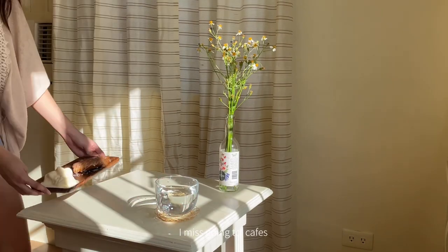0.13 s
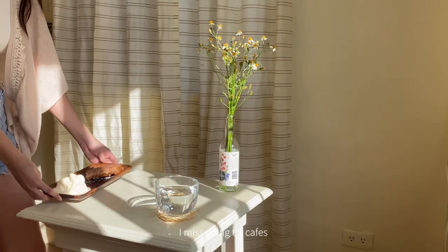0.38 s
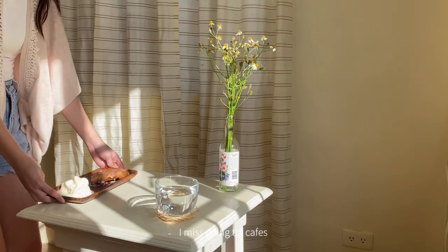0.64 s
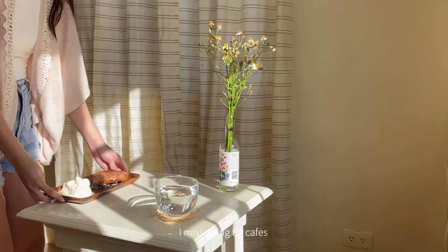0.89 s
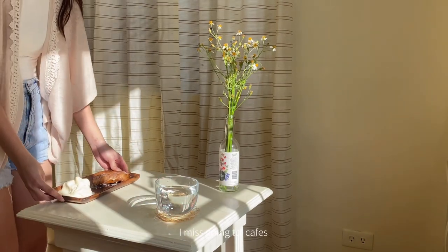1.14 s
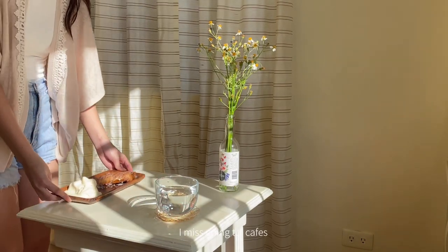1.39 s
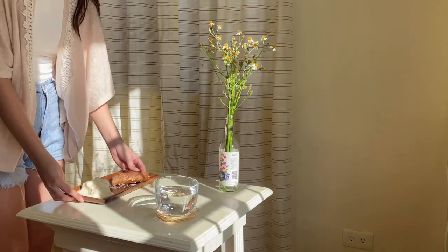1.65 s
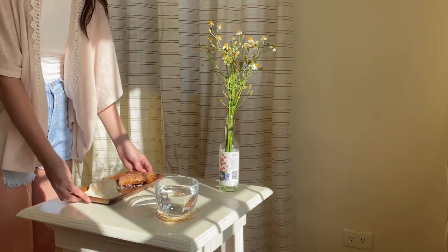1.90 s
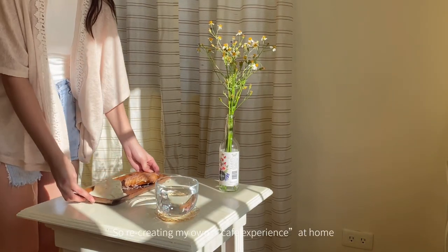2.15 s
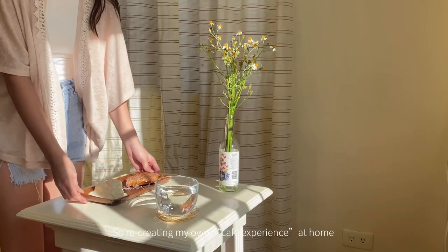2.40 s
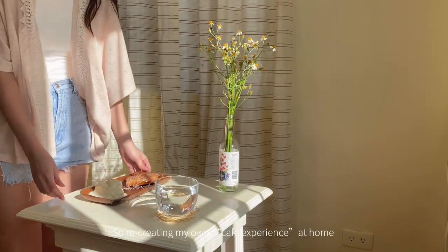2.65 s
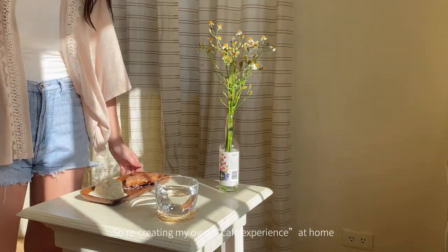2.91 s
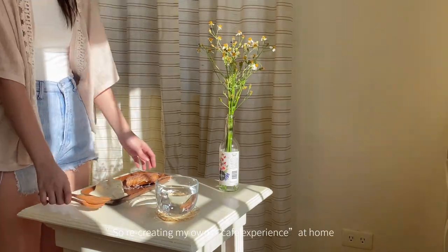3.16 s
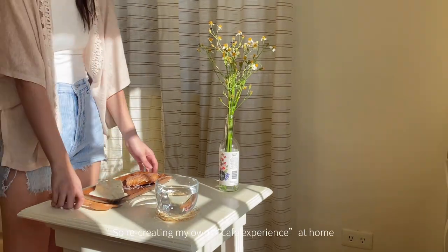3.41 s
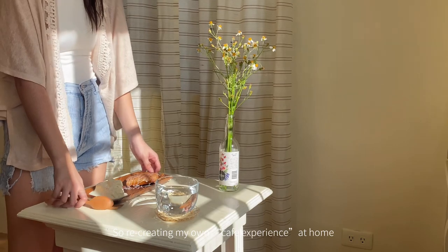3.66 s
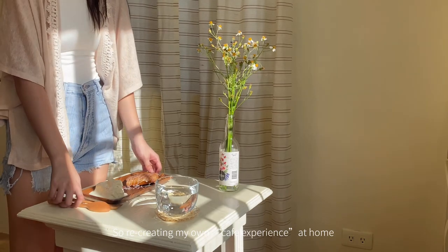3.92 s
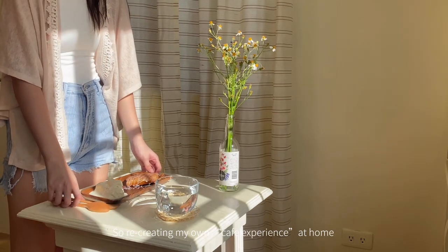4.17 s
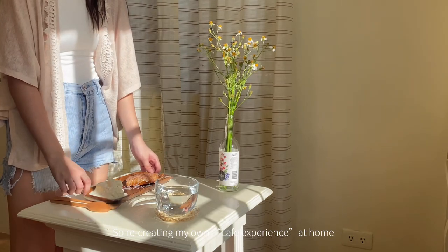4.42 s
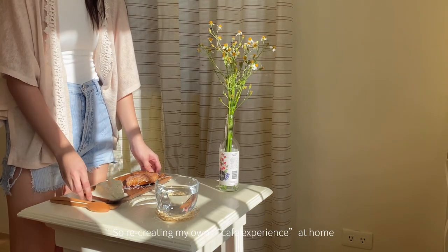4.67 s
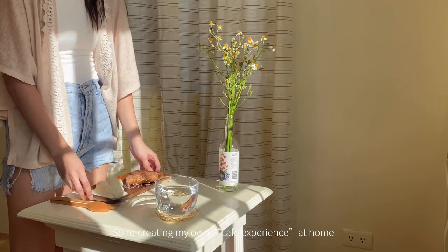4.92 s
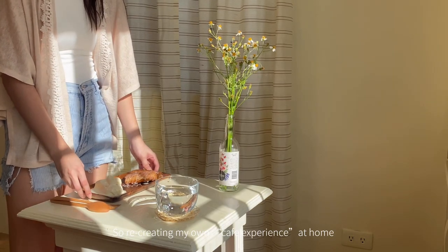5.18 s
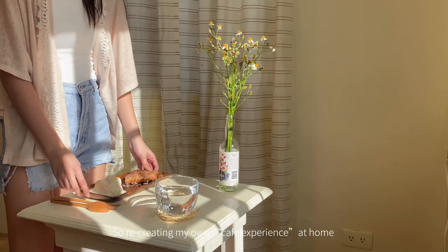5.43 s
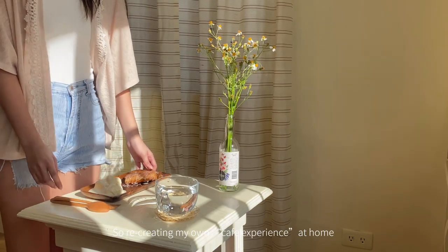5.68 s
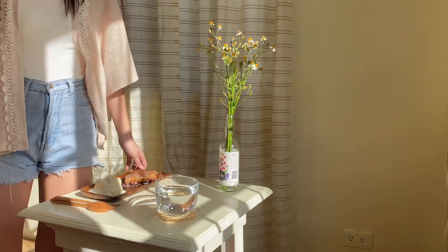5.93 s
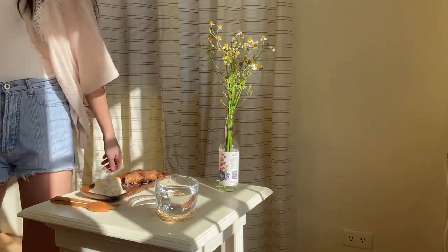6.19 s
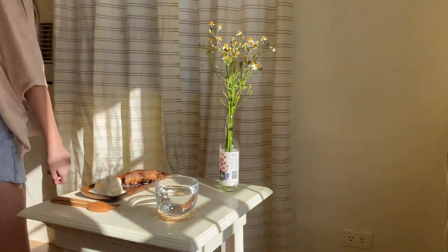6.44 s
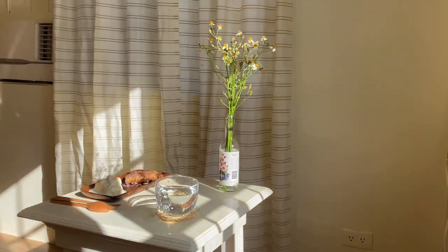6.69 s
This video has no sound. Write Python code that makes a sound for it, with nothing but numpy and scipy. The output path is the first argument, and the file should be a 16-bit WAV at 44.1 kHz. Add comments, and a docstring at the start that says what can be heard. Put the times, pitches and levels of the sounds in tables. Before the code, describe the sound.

A quiet small room with steady low murmur, wavering hum and rumble, and short soft echoes, heard closely in stereo. Faint shuffling, cloth rustle and a hoarse falling bird chirp from outdoors open it. Tiny contacts at 0.6 s lead to the loudest event at 0.8 s: a hard, hollow wooden tray knock with a bright edge and an immediate second bump. A softer bump at 1.3 s rides on a dry, grainy slide from 1.2 to 2 s, with fainter scrapes to 2.9 s, where sound drops out for an instant. From 3.2 to 4 s wooden spoons clack in irregular clusters, strongest at 3.2 and 3.7 s, with short rubs between. A sleeve brushes at 4.4 s; light taps and a scrape come around 4.6-5.2 s. Soft rustle and sliding near 5.9 s, a dry tick at 6.4 s, and sparse distant chirps until the end.

```python
"""Wooden tray and spoons on a small table

A tray is set down and slid, then spoons are laid beside it and nudged. Knocks ring decaying modes of tray,
spoons and table top and add unpitched cracks; drags are random catches that shake the same bodies.
Clothes rustle as fine shaped grain, filtered impulses give the ticks of fingers and floor and the bright edge
of the loudest tray knock, and a bird chirps hoarsely outdoors. Low hum, rumble and steady murmur lie under
a small room of noise echoes; the sound drops out once for an instant."""
import sys
import numpy as np
from scipy import signal
from scipy.fft import rfft, irfft, next_fast_len
from scipy.io import wavfile

SR = 44100
rng = np.random.default_rng(int(sys.argv[2]) if len(sys.argv) > 2 else 0)


def undo_db(level):
    """Turn decibels back into plain size, where 20 dB means ten times bigger."""
    steps = np.asarray(level, float) / 20
    return 10 ** steps


def unload_audio(sound):
    """Save the sound as a 16-bit wav file, at the path given as the first command line argument."""
    columns = np.transpose(np.atleast_2d(sound))
    # keep every value between -1 and 1, then stretch to whole-number steps
    steps = np.round(np.clip(columns, -1, 1) * 32767)
    wavfile.write(sys.argv[1], SR, steps.astype(np.int16))


N = 300573

# Modes of table top, tray and spoons. Each row: frequency in Hz, relative level in dB, T60 in seconds.
TABLE_MODES = [(88.6, -14, 0.077), (151.2, -21.5, 0.19), (246.7, -2, 0.13), (298.7, 0, 0.081),
               (329.3, -4.5, 0.11), (394.3, 3.5, 0.025)]
TRAY_MODES = [(553, -7, 0.089), (632, -2.5, 0.038), (700, -3.5, 0.025), (803, 8, 0.026), (896, -15, 0.015),
              (1037, -11, 0.026), (1100, 0, 0.023), (1310, -5, 0.01), (1590, -10, 0.032),
              (1876, -10.5, 0.011), (2270, -17, 0.019), (2560, -13, 0.0054), (3090, -23, 0.00665),
              (3553, -25, 0.018)]
SPOON_MODES = [(500, -7, 0.02), (643, -1, 0.022), (807, 6.5, 0.026), (900, -1, 0.032), (1087, 5.5, 0.021),
               (1220, 3, 0.025), (1610, 1, 0.019), (1840, -2.5, 0.013), (2215, 2.5, 0.014),
               (2625, 0.5, 0.02), (3070, -2, 0.023), (3570, -6, 0.01), (4600, -10, 0.012),
               (5320, -11, 0.0042)]
# Left-right likeness of echoes and murmur. Each row: frequency in Hz, correlation from -1 to 1.
LIKENESS = [(150, 0.84), (300, 0.4), (600, 0.5), (1200, 0.1), (6000, 0.078), (8000, 0.54), (12000, 0.53)]
BAND_EDGES_HZ = 34 * 2 ** np.arange(0, 9.1, .5)


def rms_one(x):
    """Scale to rms 1."""
    return x / np.sqrt(np.mean(x ** 2) + 1e-20)


def in_time(rows):
    """Interpolate each column over time; the first column is seconds."""
    s, *columns = np.transpose(rows)
    return [np.interp(np.arange(N) / SR, s, c) for c in columns]


def at_hz(points, hz):
    """Interpolate (Hz, value) points over log frequency."""
    point_hz, value = np.array(points).T
    return np.interp(np.log(hz), np.log(point_hz), value)


def band(x, low_hz, high_hz):
    """Band-pass filter."""
    return signal.sosfilt(signal.butter(2, [low_hz, high_hz], "band", fs=SR, output="sos"), x)


def drift(rate_hz):
    """Straight lines between normal random values, rate_hz of them per second."""
    steps = rng.standard_normal(int(N / SR * 40) + 2)
    return np.interp(np.arange(N) / SR * rate_hz, np.arange(len(steps)), steps)


def colour(x, spectrum):
    """Shape the spectrum by (Hz, dB) points; rms 1."""
    size = next_fast_len(N)
    hz = np.maximum(np.arange(size // 2 + 1) * SR / size, 1)
    return rms_one(irfft(rfft(x, size) * undo_db(at_hz(spectrum, hz)), size)[..., :N])


def strokes(rows):
    """Gain of strokes that rise, hold and fade along straight lines in dB."""
    depth_db = 36.5   # a stroke builds up from, and fades to, this far below its height
    out, t = 0, np.arange(N) / SR
    for s, build_s, hold_s, fade_s, level_db in rows:
        before = np.maximum((s + build_s - t) / build_s, 0)
        after = np.maximum((t - s - build_s - hold_s) / fade_s, 0)
        out = out + undo_db(level_db - depth_db * np.minimum(before + after, 5))
    return out


def strike(modes, t, boost_db, scatter_db, detune):
    """Free ringing, neighbours in opposite sign; each mode's strength and exact pitch vary at random by blow."""
    hz, level_db, t60_s = np.transpose(modes)[:, :, None]
    luck = rng.standard_normal((len(modes), 2, 1))
    sign = (-1) ** np.arange(len(modes))[:, None]
    gain = sign * undo_db(level_db + boost_db + scatter_db * luck[:, 0])
    tones = np.sin(2 * np.pi * hz * (1 + detune * luck[:, 1]) * t)
    return np.sum(gain * undo_db(-60 * t / t60_s) * tones, axis=0)


def crowd(body, crowd_db, count):
    """The body's modes, and among them many more with short rings at chance pitches."""
    longest_t60_s = 0.013
    hz, level_db, t60_s = np.transpose(body)
    more_hz = np.geomspace(0.95 * hz[0], 1.1 * hz[-1], count) * (1 + 0.027 * rng.standard_normal(count))
    more_db = crowd_db + np.interp(more_hz, hz, level_db)
    more_t60_s = np.minimum(np.interp(more_hz, hz, t60_s), longest_t60_s)
    return np.r_[body, np.c_[more_hz, more_db, more_t60_s]]


def knocks(rows, main, body_db, thud_db, crack_db, contact_s, centre_db, detune, scatter_db, crowd_db, chatter_db):
    """Each contact rings the body and the table top and gives one dry, unpitched crack; returns (rings, cracks)."""
    # Crack spectrum. Each row: frequency in Hz, level in dB per Hz.
    crack_spectrum = [(300, -9.5), (800, 17), (2000, 7), (3500, 8.5), (6000, -4.5), (10000, -7.5),
                      (14000, -13.5), (16000, -40.5)]
    chatter_taps, chatter_s = 6, 0.011   # uneven faces touch again this often, within this time
    table_swing_s = 0.0047
    out, cracks = np.zeros((2, N))
    t = np.arange(12000) / SR
    swing = 1 - np.exp(-(t / table_swing_s) ** 2)   # the heavy top answers late
    rise = 1 - np.exp(-(t / contact_s) ** 2)        # the force takes a moment to build
    for s, level_db, thud, crack, hardness, centre_hz in rows:
        at = round(s * SR)
        body = crowd(main, crowd_db, count=44)
        octave = np.log2(body[:, :1] / 1000)
        near_centre_db = centre_db * np.exp(-((octave - np.log2(centre_hz / 1000)) / 0.44) ** 2)
        rings = undo_db(body_db) * strike(body, t[:4000], hardness * octave + near_centre_db, scatter_db, detune)
        thump = undo_db(thud + thud_db) * strike(TABLE_MODES, t, 0, scatter_db=3.0, detune=0)
        lag, size = rng.random((2, chatter_taps))
        touches = np.zeros(2000)
        touches[(lag * chatter_s * SR).astype(int)] = undo_db(chatter_db) * (2 * size - 1) * (1 - lag / 2)
        touches[0] = 1
        rattle = signal.fftconvolve(rise[:len(rings)] * rings, touches)
        out[at:at + len(rattle)] += undo_db(level_db) * rattle
        out[at:at + len(t)] += undo_db(level_db) * swing * thump
        cracks[at + round(contact_s * SR)] = undo_db(level_db + crack + crack_db)
    return np.array([out, colour(cracks, crack_spectrum) * np.std(cracks)])


def tray_knocks():
    """The tray meets the table: broad wooden modes, slightly weaker around one pitch."""
    # Each row: start in seconds, level in dB before the offsets below, table thud and crack in dB
    # relative to that level, hardness in dB per octave.
    blows = [(0.581, -42.5, -7, -26, 8.5), (0.603, -49.5, -13, -47.5, -14.5), (0.676, -55, -23, -28, 16),
             (0.7962, -2.5, -22.5, -24.5, 2.5), (0.811, -13, -16.5, -31.5, 5.5), (1.311, -29, -7, -51, 1.5),
             (1.413, -37, -30, -43, 1), (1.597, -49, 4, -38, 1), (1.474, -48, 2.5, -2, 8),
             (2.227, -46.5, -0.5, -41, 0), (4.623, -39, 1.5, -33, -7.5), (4.892, -46.5, 0, -35, 0),
             (4.943, -48, 0.5, -36.5, -1), (5.188, -48, 0.5, -35.5, 0.5)]
    centre_hz = 764.7
    return knocks([row + (centre_hz,) for row in blows], TRAY_MODES, body_db=-3.0, thud_db=6.5, crack_db=20.5,
                  contact_s=0.0015, centre_db=-1.5, detune=0.0068, scatter_db=2.5, crowd_db=-6.5, chatter_db=-19)


def spoon_knocks():
    """Spoons meet the table and each other; every blow favours modes around its own pitch."""
    # Each row: start in seconds, level in dB before the offsets below, table thud and crack in dB
    # relative to that level, favoured pitch in Hz.
    blows = [(3.185, -16, -38, -27, 1690), (3.19, -17.5, -18, -35, 1200), (3.209, -36.5, -18.5, -12, 1600),
             (3.239, -36, -22, -22, 1510), (3.252, -34.5, -15, -20, 1900), (3.316, -41, -12, -12, 2400),
             (3.370, -25, -16, -17, 1000), (3.374, -25, -20, -30, 1230), (3.482, -42, 10, -16, 3000),
             (3.535, -25, -9, -28, 1000), (3.614, -44, -13, -27, 1300), (3.667, -15.5, -41, -18, 2700),
             (3.681, -23.5, -40, -12.5, 820), (3.692, -29.5, 1, -12.5, 1220), (3.733, -20, -38, -19, 2570),
             (3.737, -22.5, -36, -37, 1140), (3.756, -31, -8.5, -18.5, 1740),
             (3.781, -30.5, -23, -19.5, 1200), (3.882, -36.5, -11, -43, 900), (3.907, -40, -18, -47, 714),
             (3.957, -42, -24, -46, 1248), (3.994, -56, -27, -38, 1500), (4.417, -56, -18, -5, 997),
             (4.829, -48, 1, -37, 720), (5.163, -56.5, 15, -8, 643)]
    hardness_db_per_octave = 3
    rows = [row[:4] + (hardness_db_per_octave, row[4]) for row in blows]
    return knocks(rows, SPOON_MODES, body_db=-14.5, thud_db=-8.5, crack_db=25.5, contact_s=0.0011,
                  centre_db=11, detune=0.005, scatter_db=2.0, crowd_db=-0.5, chatter_db=-9)


def ring(force, modes):
    """A force sets every mode of a body ringing, each a two-pole resonator."""
    out = 0
    for hz, level_db, t60_s in modes:
        r, w = undo_db(-60 / (t60_s * SR)), 2 * np.pi * hz / SR
        out = out + signal.lfilter([0, undo_db(level_db) * np.sin(w)], [1, -2 * r * np.cos(w), r * r], force + 1e-18)
    return out


def grains(per_s, spread_db):
    """Tiny random catches of two rough surfaces; rms 1."""
    sizes = undo_db(spread_db * np.minimum(rng.exponential(1, N), 4)) * rng.choice([-1, 1], N)
    return rms_one(sizes * (rng.random(N) < per_s / SR))


def tray_scrape():
    """Uneven catches heard as broad scraping and through the tray's modes."""
    # Scraping spectrum. Each row: frequency in Hz, level in dB per Hz.
    scrape_spectrum = [(260, -40), (450, -24), (852, 4), (961, 2), (1210, -1), (4430, -17.5), (8000, -53.5),
                       (10400, -67), (17600, -120)]
    catches = grains(1400, spread_db=5.0) * undo_db(1.5 * drift(30))
    return rms_one(colour(catches, scrape_spectrum) + 0.61 * rms_one(ring(catches, TRAY_MODES)))


def spoon_rubs(rows):
    """Light spoons skip and chatter; each stroke favours a band around its own pitch."""
    half_width_octaves = 0.6
    skips = grains(2500, spread_db=3.5)
    spoons = rms_one(band(skips, 400, 3500)) + 0.45 * rms_one(ring(skips, SPOON_MODES[:10]))
    out = 0
    for *stroke, hz in rows:
        rub = band(spoons, hz / 2 ** half_width_octaves, hz * 2 ** half_width_octaves)
        out = out + strokes([stroke]) * rms_one(rub)
    return out


def table_drag():
    """Dragged wood shakes the upper table modes by dense, unsteady catches."""
    catches = grains(500, spread_db=1.0) * undo_db(2.2 * drift(17))
    return rms_one(ring(catches, TABLE_MODES[2:]))


def cloth_rustle(hiss):
    """Cloth and skin give a fine, bright grain: hiss follows the given gain, sleeves brush in strokes."""
    # Cloth and sleeve spectra. Each row: frequency in Hz, level in dB per Hz.
    cloth_spectrum = [(500, -38.5), (1000, -8), (2500, -2), (5000, -8.5), (8000, -23), (10500, -23),
                      (14000, -24), (15800, -31.5)]
    sleeve_spectrum = [(500, -8), (1500, 0.5), (3000, 0.5), (6000, -8), (8000, -10), (10500, -12),
                       (14000, -8.5), (15800, -23.5)]
    # Each row: start, build-up, hold and fade in seconds, level in dB.
    brushes = [(.06, 0.029, 0.038, 0.15, -100), (.32, 0.024, 0.058, 0.06, -64.5),
               (2.32, 0.041, 0.059, .15, -69), (2.5, 0.045, 0.42, 0.013, -75.5),
               (4.0, .01, 0.011, 0.027, -92), (4.405, 0.0044, 0.028, 0.065, -60.5),
               (5.08, 0.029, 0.014, .1, -77), (5.82, 0.05, 0.15, 0.05, -64)]
    fine = grains(4400, spread_db=-2.0)
    return hiss * colour(fine, cloth_spectrum) + strokes(brushes) * colour(fine, sleeve_spectrum)


def rubbing():
    """Slides scrape tray and spoons, drag the table and rustle cloth, over faint shuffling that dies down."""
    # Each row: start, build-up, hold and fade in seconds, level in dB.
    tray_rows = [(1.2, 0.12, 0.28, 0.11, -51.5), (1.55, .1, 0.071, 0.31, -63), (1.6, 0.32, 0.16, 0.13, -62),
                 (2.5, 0.045, 0.075, 0.11, -69.5), (2.6, 0.069, 0.054, 0.18, -64),
                 (2.75, 0.068, 0.073, 0.042, -66.5), (2.93, 0.04, 0.021, 0.05, -75),
                 (4.7, 0.059, 0.09, 0.11, -61.5), (4.76, 0.13, 0.07, 0.13, -53),
                 (5.8, 0.21, 0.018, 0.074, -60.5)]
    # Each row: start, build-up, hold and fade in seconds, level in dB, favoured pitch in Hz.
    spoon_rows = [(3.2, 0.03, 0.1, 0.15, -47, 1700), (3.42, 0.036, 0.05, 0.2, -50, 900),
                  (3.545, 0.02, 0.04, 0.1, -49, 2500), (3.6, 0.03, 0.04, 0.1, -46, 1300),
                  (3.76, 0.02, 0.02, 0.2, -44, 1800), (3.865, 0.015, 0.11, 0.2, -51, 1000),
                  (4.04, 0.015, 0.012, 0.04, -51, 1000)]
    # Shuffling. Each row: time in seconds, table drag in dB, tray scrape in dB.
    shuffle = [(0, -64.5, -63.5), (1.0, -62.5, -64.5), (1.9, -65.5, -65), (2.9, -75, -74),
               (2.95, -68.5, -74), (4.1, -68.5, -85.5), (5.3, -69.5, -75), (6.8, -74, -98.5)]
    # Drag and hiss grow twice as fast in dB as the scraping; levels hold for a stroke of firm_db.
    firm_db, cloth_rest_db = -49.5, -94.5
    tray_drag_db, tray_hiss_db, spoon_drag_db, spoon_hiss_db = -43, -55, -88, -67.5
    tray_slide = strokes(tray_rows)
    spoon_slide = strokes([row[:-1] for row in spoon_rows])
    tray_load, spoon_load = (tray_slide / undo_db(firm_db)) ** 2, (spoon_slide / undo_db(firm_db)) ** 2
    low_db, middle_db = in_time(shuffle)
    pull = undo_db(low_db) + undo_db(tray_drag_db) * tray_load + undo_db(spoon_drag_db) * spoon_load
    hiss = undo_db(cloth_rest_db) + undo_db(tray_hiss_db) * tray_load + undo_db(spoon_hiss_db) * spoon_load
    wood = pull * table_drag() + (undo_db(middle_db) + tray_slide) * tray_scrape()
    return wood + spoon_rubs(spoon_rows) + cloth_rustle(hiss)


def ticks():
    """Dry, bright ticks of fingers and floor, and the bright edge of the loudest tray knock: filtered impulses."""
    # Each row: time in seconds, impulse level in dB before filtering.
    snaps = [(0.0786, -32.5), (0.7563, -26.5), (0.8, -7), (2.5228, -33.5), (2.596, -30.5), (4.0025, -30),
             (6.3654, -12.5)]
    out = np.zeros(N)
    for s, level_db in snaps:
        out[round(s * SR)] = undo_db(level_db)
    return signal.lfilter([.35], [1, -.45], band(out, 805, 14000))


def bird(length_s, fall_s, hoarse_hz):
    """Hoarse chirps that drop fast and settle: a falling tone times slow noise."""
    # Each row: start in seconds, level in dB, start and end pitch in Hz.
    chirps = [(0.171, -64, 5840, 3310), (0.966, -67.5, 5450, 3910), (2.358, -67.5, 5160, 3326),
              (4.55, -60, 5060, 3124), (5.139, -67, 5430, 3300), (5.295, -66.5, 4480, 3200),
              (6.209, -73, 4940, 3320), (6.78, -63.5, 4620, 4090)]
    out, t = np.zeros(N + SR), np.arange(int(.15 * SR)) / SR
    swell = np.sin(np.pi * np.clip(t / length_s, 0, 1) ** 0.85)
    for s, level_db, start_hz, end_hz in chirps:
        hz = end_hz + (start_hz - end_hz) * np.exp(-(t / fall_s) ** 2)
        tone = np.sin(2 * np.pi * np.cumsum(hz) / SR)
        rasp = rms_one(band(rng.standard_normal(len(t)), 27, hoarse_hz))
        at = round(s * SR)
        out[at:at + len(t)] += undo_db(level_db) * swell * rasp * tone
    return out[:N]


def stereo(mid, side, hz):
    """Blend two independent noises to the left-right likeness at hz; left and right lead the result."""
    alike = np.clip(at_hz(LIKENESS, hz), -1, 1)
    common, apart = np.sqrt(1 + alike) * mid, np.sqrt(1 - alike) * side
    return np.stack([common + apart, common - apart])


def room(x, gap_s):
    """Early scatter from table and nearby wall, then diffuse echoes that die band by band."""
    # Each row: frequency in Hz, T60 in seconds.
    late_t60 = [(300, 0.3), (1500, 0.33), (5000, .3), (12000, 0.26)]
    early_db, early_t60_s = 5, 0.05
    places, place_s = 6, .11   # echo patterns cross-fade in a cycle, one step per place_s
    t = np.arange(int(.6 * SR)) / SR
    white, echo = rng.standard_normal((2, places, len(t))), 0
    early = undo_db(early_db - 60 * t / early_t60_s)
    for low, high in zip(BAND_EDGES_HZ[2:], BAND_EDGES_HZ[3:]):
        hz = np.sqrt(low * high)
        late = undo_db(-60 * t / at_hz(late_t60, hz))
        # one noise pair per place
        mid, side = band(white, low, high) * np.hypot(early, late)
        echo = echo + stereo(mid, side, hz)
    echo = echo * np.clip(t / gap_s, 0, 1)
    echo /= np.sqrt(np.sum(echo ** 2) / 2 / places)
    turn = (np.arange(N) / SR / place_s - np.arange(places)[:, None]) % places
    share = np.cos(np.pi / 2 * np.clip(np.minimum(turn, places - turn), 0, 1))
    size = next_fast_len(N + len(t))
    return irfft(np.sum(rfft(x * share, size) * rfft(echo, size), axis=1), size)[:, :N]


def hum():
    """A wavering hum near 92 Hz over a deeper rumble, and a short faint whir near 1 kHz."""
    # Each row: time in seconds, hum in dB, rumble in dB.
    levels = [(0.0, -42.5, -56), (0.34, -82.5, -66), (0.64, -57, -56), (0.72, -75, -62), (0.83, -46, -44),
              (1.04, -69.5, -63.5), (1.48, -53.5, -56.5), (1.69, -67.5, -60.5), (2.85, -75.5, -69.5),
              (2.98, -61, -75.5), (3.57, -68, -70), (3.72, -54, -53.5), (3.93, -79, -71),
              (5.33, -61.5, -60.5), (5.64, -63, -70.5), (6.13, -59.5, -64.5), (6.82, -71.5, -68.5)]
    # Each row: start, build-up, hold and fade in seconds, level in dB.
    whir = [(.2, 0.045, .3, 0.2, -67.5)]
    side_db = -16.5   # part of the rumble that differs between the ports
    hum_db, rumble_db = in_time(levels)
    noise = rng.standard_normal((4, N))
    rumble = noise[1] + undo_db(side_db) * noise[3] * [[1], [-1]]
    low = undo_db(hum_db) * rms_one(band(noise[0], 89, 97)) + undo_db(rumble_db) * rms_one(band(rumble, 44, 64))
    return low + strokes(whir) * rms_one(band(noise[2], 1015, 1073))


def air(patchy_db):
    """The room's steady murmur: noise bands, each wavering slightly on its own."""
    # Each row: frequency in Hz, relative band gain in dB.
    murmur = [(70, -5), (114, 0.5), (160, -6), (330, -18), (480, -19), (1800, -25.5), (4000, -37.5),
              (7000, -45.5), (12000, -49), (15500, -64)]
    level_db = -64
    out, white = 0, rng.standard_normal((2, 2, N))
    for k, (low, high) in enumerate(zip(BAND_EDGES_HZ[3:-1], BAND_EDGES_HZ[4:])):
        hz = np.sqrt(low * high)
        mid, side = band(white[k % 2], low, high)
        gain = undo_db(at_hz(murmur, hz) + patchy_db * drift(12.0))
        out = out + gain * stereo(mid, side, hz)
    return undo_db(level_db) * rms_one(out)


def dropout():
    """Gain that falls to silence for an instant, with short ramps."""
    at_s, silent_s = 2.918, .004   # each ramp also lasts silent_s
    return np.clip(np.abs(np.arange(N) / SR - at_s) / silent_s - .5, 0, 1)


def scene():
    """Direct sound, room echoes and background, cut by the dropout."""
    direct_db, table_direct_db = -6, -8
    room_db, crack_room_db = -2, 5   # cracks spread all round and fill the room more evenly than the ringing
    rings, cracks = tray_knocks() + spoon_knocks()
    near = rings + cracks + ticks() + rubbing()
    far = bird(length_s=0.1, fall_s=0.029, hoarse_hz=418)
    # the wide boards beam their low modes straight at the listener
    direct = undo_db(direct_db) * near + undo_db(table_direct_db) * band(near, 47.0, 840)
    to_room = undo_db(room_db) * band(near, 110, 14000) + undo_db(crack_room_db) * cracks + far
    echoes = room(to_room, gap_s=0.0015)
    return dropout() * (direct + echoes + air(patchy_db=.7) + hum())


def low_pass(x):
    """Removes everything above the highest recorded frequency."""
    return signal.sosfilt(signal.butter(12, 15520, fs=SR, output="sos"), x)


def record(dry):
    """Two microphone ports differ in phase and level by frequency; the deepest bass is cut."""
    # Each row: frequency in Hz, phase the left trails by in radians, left minus right in dB.
    ports = [(0, 0, 0), (300, 0, -3.5), (600, 0, 0), (1500, 0, 0), (3300, -3.1, 2.5), (5500, -4.6, 6),
             (6600, -6.3, 2), (8300, -3.14, 0), (15900, 9.42, 0)]
    low_cut_hz = 14
    size = next_fast_len(N)
    port_hz, trail_rad, lean_db = np.transpose(ports)
    hz = np.arange(size // 2 + 1) * SR / size
    left = undo_db(np.interp(hz, port_hz, lean_db) / 2) * np.exp(-.5j * np.interp(hz, port_hz, trail_rad))
    x = irfft(rfft(dry, size) * [left, 1 / left], size)[:, :N]
    mix = signal.sosfilt(signal.butter(4, low_cut_hz, "high", fs=SR, output="sos"), x)
    return low_pass(mix)


dry = scene()
out = record(dry)
unload_audio(out)
```